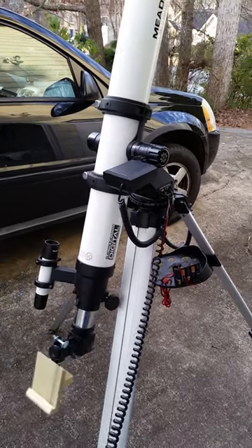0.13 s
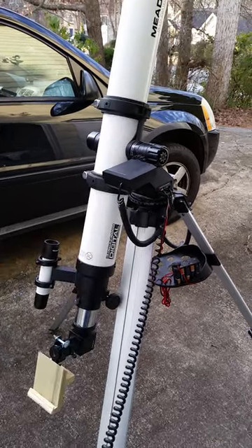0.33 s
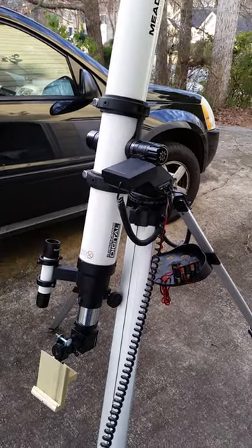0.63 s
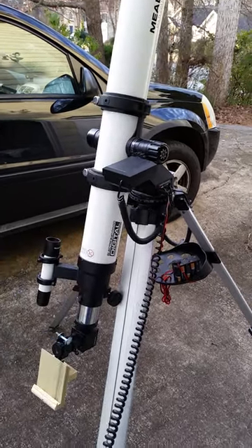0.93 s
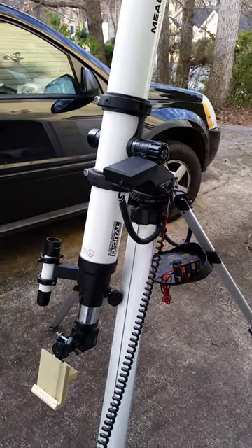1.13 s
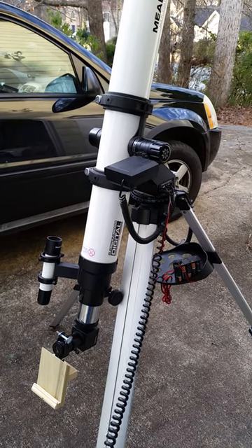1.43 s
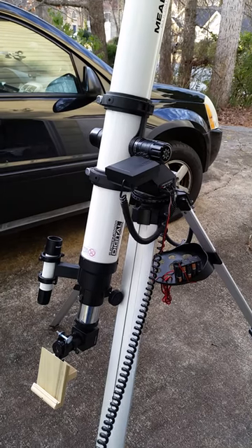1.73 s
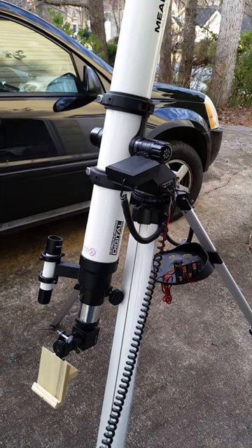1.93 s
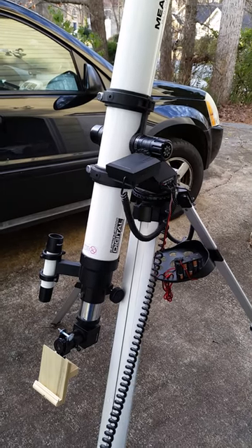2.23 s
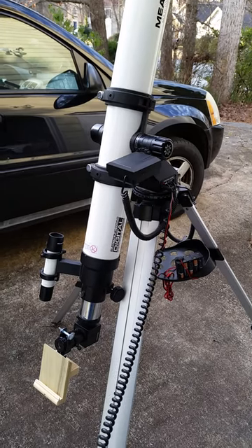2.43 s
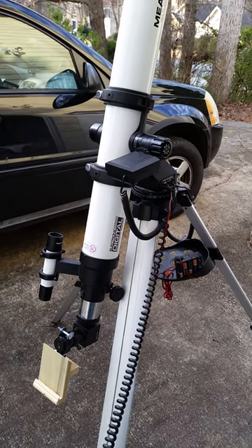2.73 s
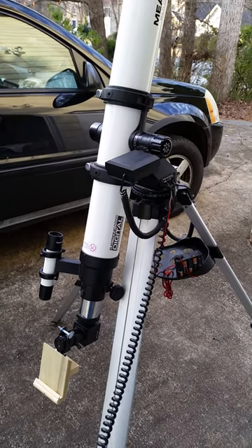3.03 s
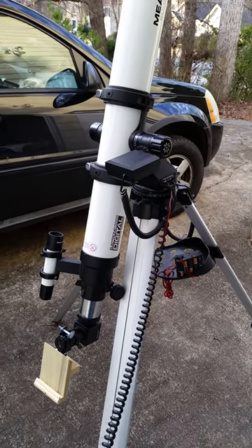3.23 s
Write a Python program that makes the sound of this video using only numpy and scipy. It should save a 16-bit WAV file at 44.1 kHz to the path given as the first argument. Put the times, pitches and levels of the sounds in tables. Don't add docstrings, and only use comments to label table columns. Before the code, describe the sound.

Close, hard knocks and gritty scraping come first on a driveway, with ringing bounces fading away; a distant crow calls in the quiet, then a mount groans and its small motor spins up, grinding until the end.

```python
import sys
import numpy as np
from scipy import signal
from scipy.fft import rfft, irfft, next_fast_len
from scipy.io import wavfile
from scipy.ndimage import map_coordinates

SR = 44100
rng = np.random.default_rng(int(sys.argv[2]) if len(sys.argv) > 2 else 0)


def wav_out(sig):
    wavfile.write(sys.argv[1], SR, np.round(np.clip(np.atleast_2d(sig).T, -1, 1) * 32767).astype(np.int16))


def undo_db(level):
    steps = np.asarray(level, float) / 20
    return 10 ** steps


N = 148617
T = np.arange(N) / SR

# frequency in Hz, left over right in dB.
FAR_PAN = [(60, -9), (130, -2), (290, 0.5), (640, -0.5), (1410, 2), (3100, 5.5), (6820, 46), (15000, -17)]


def unit(x):
    return x / np.sqrt(np.mean(np.abs(x) ** 2) + 1e-20)


def along(points, hz):
    f, v = np.transpose(points)
    return np.interp(np.log(hz + 1), np.log(f + 1), v)


def wobble(rate, order=3):
    return map_coordinates(rng.standard_normal(int(N * rate / SR) + 4), [T * rate], order=order)


def filtered(x, response):
    m = next_fast_len(N + SR // 2)
    return irfft(rfft(x, m) * response(np.fft.rfftfreq(m, 1 / SR)), m)[..., :N]


def ports(x, pan, lead_s):
    def response(hz):
        level = 2 / (1 + undo_db(np.outer([-1, 1], along(pan, hz))))
        return level * np.exp(1j * np.pi * lead_s * np.outer([1, -1], hz))
    return filtered(x, response)


def noise(db_of, alike):
    def mid_side(hz):
        turn = np.arccos(np.clip(alike(hz), -1, 1)) / 2
        return undo_db(db_of(hz)) * [np.cos(turn), np.sin(turn)]
    mid, side = filtered(rng.standard_normal((2, N)), mid_side)
    return unit(np.array([mid + side, mid - side]))


def blurred(phase, blur_hz, order=1):
    return unit(wobble(blur_hz, order) * np.cos(phase) + wobble(blur_hz, order) * np.sin(phase))


def yard(x):
    # frequency in Hz, t60 in seconds.
    yard_t60 = [(200, 0.6), (2000, 0.66), (10000, 0.42)]
    hz, t, z = signal.stft(rng.standard_normal((2, SR // 2)), SR, nperseg=256)
    tail = signal.istft(z * undo_db(-60 * t / along(yard_t60, hz)[:, None]), SR, nperseg=256)[1]
    delayed = np.pad(x, (300, 0))[None]
    return signal.fftconvolve(delayed, tail / np.linalg.norm(tail[0]), axes=1)[:, :N]


def background():
    # frequency in Hz, level in dB per Hz.
    traffic = [(8.8, -49.5), (15, -16.5), (43, -7), (74, -8), (189, -8), (232, -15.5), (319, -19.5),
               (647, -33), (3500, -54.5), (4550, -92), (7700, -120)]
    # centre in Hz, width in Hz, dB over the hum.
    drones = [(87.2, 28, 9), (114.9, 5.8, 4.5), (152, 1.2, 19), (206.7, 5.1, 7)]
    # time in seconds, level in dB.
    hum_level = [(0.0, -50), (1.0, -50.5), (1.45, -52), (1.8, -47.5), (2.15, -51.5), (2.7, -50.5),
                 (3.37, -49.5)]
    # frequency in Hz, left-right likeness.
    likeness = [(60, 0.74), (240, 0.78), (950, 0.13), (3770, -0.47), (15000, 0.01)]
    # frequency in Hz, level in dB per Hz.
    hiss_colour = [(1760, -52), (3000, -65.5), (3430, -22.5), (4300, 3), (4840, -2.5), (5260, 0),
                   (5580, -5.5), (6200, -40), (6600, -65), (8580, -71), (14500, -120)]
    # frequency in Hz, level in dB per Hz.
    own_colour = [(3760, -68), (6400, -13.5), (8670, -11.5), (9970, -10.5), (12200, -4), (15700, 3)]

    def hum_db(f):
        engines = sum(db * np.exp(-((f - c) / w) ** 2) for c, w, db in drones)
        return along(traffic, f) + engines

    hum = noise(hum_db, lambda f: along(likeness, f))
    hum = hum * undo_db(np.interp(T, *np.transpose(hum_level)) + 0.6 * wobble(7.5))
    hiss = undo_db(-69 + 0.4 * wobble(14)) * noise(lambda f: along(hiss_colour, f), lambda f: 0.83 + 0 * f)
    own = undo_db(-80) * noise(lambda f: along(own_colour, f), lambda f: 0 * f)
    return ports(hum + hiss, FAR_PAN, lead_s=0.00023) + own


def crow():
    # start in seconds, length in seconds, from Hz, to Hz, level in dB.
    caws = [
        (1.108, 0.22, 1420, 1204, -77.5),
        (1.379, 0.16, 1433, 1383, -84.5),
        (1.708, 0.214, 1391, 1348, -73.5),
        (1.918, 0.15, 1420, 1272, -80.5),
        (2.087, 0.13, 1494, 1375, -81),
    ]
    blur_hz, rasp_hz, rasp_depth = 260, 73.7, 0.4
    upper_ratio, upper_db = 2.4, -16.5
    bird = np.zeros(N)
    for s, length, hz0, hz1, db in caws:
        u = np.clip((T - s) / length, 0, 1)
        phase = 2 * np.pi * np.cumsum(hz0 + (hz1 - hz0) * u) / SR
        swell = np.sin(np.pi * u) ** 0.5
        voice = blurred(phase, blur_hz) + undo_db(upper_db) * blurred(upper_ratio * phase, 3 * blur_hz)
        rasp = 1 + rasp_depth * np.cos(2 * np.pi * rasp_hz * T)
        bird += undo_db(db) * swell * voice * rasp
    return ports(1.03 * bird + yard(bird), FAR_PAN, lead_s=0.00023)


def scrape():
    # time in seconds, level in dB.
    slide = [(0, -58.5), (.07, -60), (.11, -56.5), (.16, -76), (.24, -66.5), (.3, -83)]
    # frequency in Hz, level in dB.
    grit_colour = [(1000, 7), (2500, 10.5), (4000, 5.5), (7500, -16.5), (8500, -33), (12000, -11)]
    level_db = np.interp(T, *np.transpose(slide), right=-200) + 3 * wobble(140)
    return undo_db(level_db) * noise(lambda f: along(grit_colour, f), lambda f: 0.36 + 0 * f)


def slaps():
    # start in seconds, centre in Hz, level in dB.
    contacts = [(.002, 588, -36.5), (0.11, 1400, -39), (0.133, 650, -29.5), (0.248, 1480, -55),
                (0.317, 1900, -35), (0.609, 1700, -55), (0.768, 1810, -87), (2.605, 1100, -71),
                (0.09, 151, -55), (0.17, 260, -55), (0.199, 2530, -67), (0.268, 293, -43)]
    t60, width, rise_s = 0.05, 0.3, 0.001
    out, t = np.zeros(N), T[:SR // 4]
    for s, hz, db in contacts:
        knots = rng.standard_normal((2, 300))
        a, b = [np.interp(t * width * hz, np.arange(300), k) for k in knots]
        burst = unit(a * np.cos(2 * np.pi * hz * t) + b * np.sin(2 * np.pi * hz * t))
        envelope = np.clip(t / rise_s, 0, 1) ** 2 * undo_db(db - 60 * t / t60)
        out[round(s * SR):][:len(t)] += envelope * burst
    return out


def ticks():
    # start in seconds, level in dB.
    cracks = [
        (0.1105, -50),
        (0.12, -56),
        (0.1318, -47),
        (0.3145, -40),
        (0.3205, -48),
        (0.608, -62),
        (1.426, -70),
    ]
    # frequency in Hz, level in dB.
    crack_colour = [(800, -12), (2500, -2), (4800, 2), (6500, -6), (8300, -10), (11000, 1), (13000, -3),
                    (15500, -1)]
    rise_s, t60 = 0.00054, 0.009
    shape = sum(np.clip((T - s) / rise_s, 0, 1) * undo_db(db - 60 * np.abs(T - s) / t60) for s, db in cracks)
    return shape * unit(filtered(rng.standard_normal(N), lambda f: undo_db(along(crack_colour, f))))


def struck(hits, modes, attack_s, jingle_db):
    # frequency in Hz, level in dB.
    rattle_colour = [(200, 6), (700, 12), (2000, -7), (3500, -14), (6000, -52)]
    # frequency in Hz, level in dB.
    jingle_colour = [(2500, -32), (5000, 9.5), (6500, -16), (8500, -31), (10500, -1.5), (15000, -22)]
    shake_t60, shake_rise_s = 0.41, 0.002
    ring, shake, t = np.zeros(N + SR), np.zeros((2, N + SR)), T[:SR // 2]
    for s, db, bright_db, long in hits:
        luck = np.resize(rng.standard_normal(16), len(modes))
        at = slice(round(s * SR), round(s * SR) + len(t))
        tones = 0
        for k, ((hz, level, t60), a) in enumerate(zip(modes, luck)):
            mode_db = db - 4.5 + level + bright_db * np.log2(hz / 700) + a
            phase = 2 * np.pi * hz * t + np.pi * k + a / 5
            tones = tones + undo_db(mode_db - 60 * t / (t60 * long)) * np.sin(phase)
        ring[at] += (1 - np.exp(-t / attack_s)) ** 2 * tones
        loose_db = np.c_[[db - 14, -44 + jingle_db + 1.63 * (db + 20)]]
        shake[:, at] += np.clip(t / shake_rise_s, 0, 1) ** 2 * undo_db(loose_db - 60 * t / (shake_t60 * long))
    rattle = shake[0, :N] * noise(lambda f: along(rattle_colour, f), lambda f: 0.46 + 0 * f)
    jingle = shake[1, :N] * noise(lambda f: along(jingle_colour, f), lambda f: 0 * f)
    return ring[:N] + rattle + jingle


def tube_knocks():
    # start in seconds, peak in dB, brightness in dB per octave, ring length factor.
    knocks = [
        (0.002, -26, 1.5, 0.78),
        (0.1103, -25, 7.5, 0.32),
        (0.1325, -27.5, 0.5, 0.57),
        (0.247, -35, 2, 0.51),
        (0.261, -57, -14, 0.51),
    ]
    # frequency in Hz, level in dB, t60 in seconds.
    tube_modes = [(240.2, -1.5, 0.2), (430, -14, 0.046), (558.4, -11, 0.22), (669.6, -6.5, 0.18),
                  (800, -4.5, 0.03), (1020, -9.5, 0.12), (1420, -14.5, 0.095), (1692, -14, 0.055),
                  (2040, -23.5, .1), (2950, -27, 0.071)]
    return struck(knocks, tube_modes, attack_s=0.00034, jingle_db=-4)


def bracket_bounces():
    # start in seconds, peak in dB, brightness in dB per octave, ring length factor.
    bounces = [
        (0.3155, -20, -2, 0.72),
        (0.6085, -35, -5.5, 0.68),
        (0.766, -39, -4, 0.51),
        (0.878, -49.5, -6, 0.61),
        (0.963, -56, -11, 0.88),
    ]
    bracket_hz = [240, 404, 525, 560, 660, 696, 732, 726, 820, 893, 953, 1050, 1530, 1770]
    # level in dB, t60 in seconds.
    bracket_ring = [(-5.5, 0.08), (-23.5, 0.051), (-3.5, 0.08), (-9, 0.15), (-14.5, 0.13), (6.5, 0.15),
                    (2, 0.29), (-14.5, 0.65), (2.5, 0.053), (0.5, 0.083), (-11.5, 0.21), (-4, 0.098),
                    (-24, .12), (-21, 0.15)]
    return struck(bounces, np.c_[bracket_hz, bracket_ring], attack_s=0.00086, jingle_db=-1.3)


def groan():
    # centre in Hz, blur in Hz, level in dB.
    resonances = [(292, 25, -56.5), (440, 50, -65), (788, 270, -70), (1640, 240, -73.5)]
    start_s, length_s = 2.695, 0.099
    swell = np.sin(np.pi * np.clip((T - start_s) / length_s, 0, 1)) ** 0.5
    return swell * sum(undo_db(db) * blurred(2 * np.pi * hz * T, blur_hz) for hz, blur_hz, db in resonances)


def blows():
    # frequency in Hz, left over right in dB.
    knock_pan = [(60, -10), (150, -2.5), (380, -0.5), (950, 3), (2380, 2), (5980, 25.5), (15000, 3.5)]
    dry_blows = tube_knocks() + bracket_bounces() + ticks() + slaps() + scrape() + groan()
    return ports(dry_blows + undo_db(-15) * yard(dry_blows[0]), knock_pan, lead_s=0.0001)


def shaft_speed():
    rest_s, climb_per_s2, knee = 2.675, 1250, 5
    top_speed, load_s, sag, sag_power = 173.9, 2.9, 64, 1.4
    climb = np.clip(climb_per_s2 * (T - rest_s), 1, None)
    free = top_speed - sag * np.clip(T - load_s, 0, None) ** sag_power
    return free / (1 + (free / climb) ** knee) ** (1 / knee)


def case_db(f):
    # centre in Hz, width in Hz, level in dB.
    case_peaks = [(6430, 280, -11), (9750, 290, -11), (10560, 220, 5.5), (11000, 200, 5.5),
                  (11300, 220, -3.5), (12040, 250, -15), (12500, 200, 6), (13160, 370, -16),
                  (13450, 250, 10)]
    return sum(db * np.exp(-((f - hz) / w) ** 2) for hz, w, db in case_peaks)


def shaft_orders(turn, spin, teeth):
    # multiple of the shaft rate, level in dB.
    shaft_levels = [(2, -13), (4, -1.5), (5, -8), (6, -5.5), (7, -8), (8, -5.5), (9, -8), (10, -7),
                    (11, -27), (12, 12.5), (13, -12), (14, -40), (24, -10.5), (36, -15)]
    phase_blur = 0.2 + 1.6 * (1 - spin)
    orders = 0
    for k, db in shaft_levels:
        drift_db = (k != teeth) * 2 * wobble(13, order=1)
        phase = k * turn + k * k + phase_blur * wobble(90, order=1)
        orders = orders + undo_db(db + drift_db) * np.sin(phase)
    return orders


def gear_mesh(turn, teeth):
    # multiple of the tooth rate, level in dB, clean share of the tone.
    overtones = [(2, -20, 0.45), (3, -1.5, 0.39), (3.2, -7.5, 0.036), (4, 13.5, 0.071), (5, 3, 1),
                 (6, -8.5, 0.12), (7, 3, 0.073)]
    smear_hz, eccentric = 95, 0.54
    mesh = 0
    for k, db, clean in overtones:
        phase = k * teeth * turn
        tone = clean * np.sin(phase) + (1 - clean) * blurred(phase, smear_hz * k, order=3)
        mesh = mesh + undo_db(db) * tone * (1 + eccentric * np.cos(turn + k))
    return mesh


def motor():
    # time in seconds, whine in dB, grind in dB.
    effort = [
        (2.701, -118, 12),
        (2.76, -102, 12),
        (2.8, -84, 0),
        (2.86, -68.5, -9.5),
        (2.95, -65, -4.5),
        (3.05, -57.5, -2),
        (3.2, -62, 1.5),
        (3.37, -63.5, 6),
    ]
    # frequency in Hz, level in dB.
    housing = [(1300, -1), (1600, 0), (1880, -9.5), (2040, -3.5), (5600, 9.5), (7000, -23.5), (11400, 6),
               (14500, -25)]
    # frequency in Hz, level in dB per Hz.
    grind_colour = [(300, -4.5), (1300, -14), (1600, -0.5), (1850, -1), (2150, 0.5), (2700, -14),
                    (6000, -12), (6700, -50)]
    # frequency in Hz, level in dB per Hz.
    sizzle_colour = [(9300, -30), (10300, 24), (11000, 0), (14500, 2), (15700, -1)]
    sizzle_db = [-60.5, -103]
    # frequency in Hz, left over right in dB.
    near_pan = [(60, -5), (130, -14), (290, 0), (640, 4.5), (1410, 6), (3100, 7.5), (6820, 75), (15000, -5)]
    teeth = 12
    s, whine_db, grind_db = np.transpose(effort)
    speed = shaft_speed()
    turn = 2 * np.pi * np.cumsum(speed * (1 + 0.00082 * wobble(40))) / SR
    spin = (speed / speed.max()) ** 2.8 * np.clip((T - s[0]) / 0.017, 0, 1)

    whine = (T > s[0]) * undo_db(np.interp(T, s, whine_db))
    tones = undo_db(-2.5) * whine * gear_mesh(turn, teeth) + spin * undo_db(-62) * shaft_orders(turn, spin, teeth)
    tones = filtered(tones, lambda f: undo_db(along(housing, f) + case_db(f)))

    once_a_turn = 1 + 0.5 * np.cos(turn)
    grit = unit(filtered(rng.standard_normal(N) * once_a_turn, lambda f: undo_db(along(grind_colour, f))))
    grind_level = undo_db(-54 + np.interp(T, s, grind_db) + 0.7 * wobble(6))
    drive = tones + spin ** 2 * grind_level * grit

    sizzle = noise(lambda f: along(sizzle_colour, f) + case_db(f), lambda f: 0 * f)
    brush = spin ** 3 * undo_db(np.c_[sizzle_db]) * sizzle
    return ports(drive + undo_db(-3.5) * yard(drive), near_pan, lead_s=0.00016) + brush


def scene():
    return background() + crow() + blows() + motor()


def band_limit(x):
    return signal.sosfilt(signal.butter(12, 16610, fs=SR, output="sos"), x)


def record(dry):
    ceiling, top_hz, offset = 0.14, 15750, -0.0004
    held = dry / (1 + (dry / ceiling) ** 2) ** 0.5
    mix = filtered(held, lambda hz: hz < top_hz) + offset
    return band_limit(mix)


dry = scene()
out = record(dry)
wav_out(out)
```